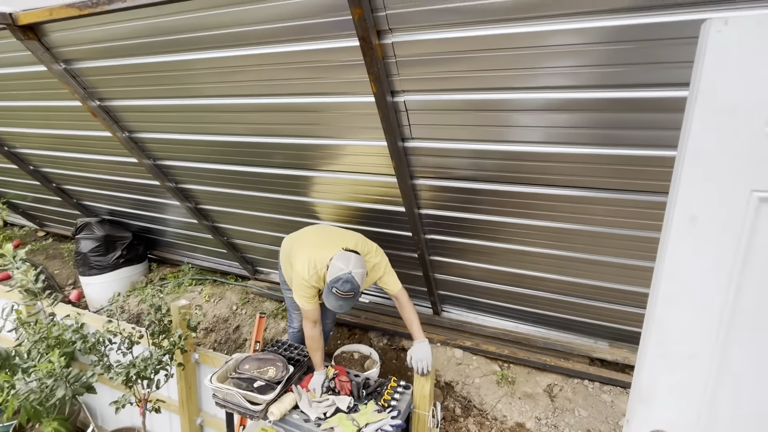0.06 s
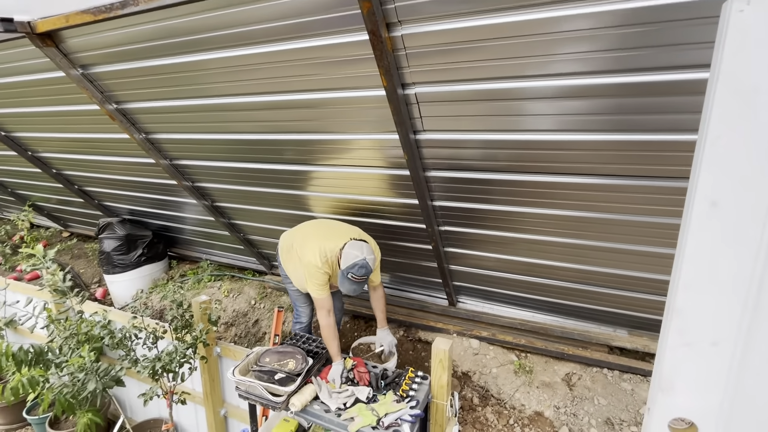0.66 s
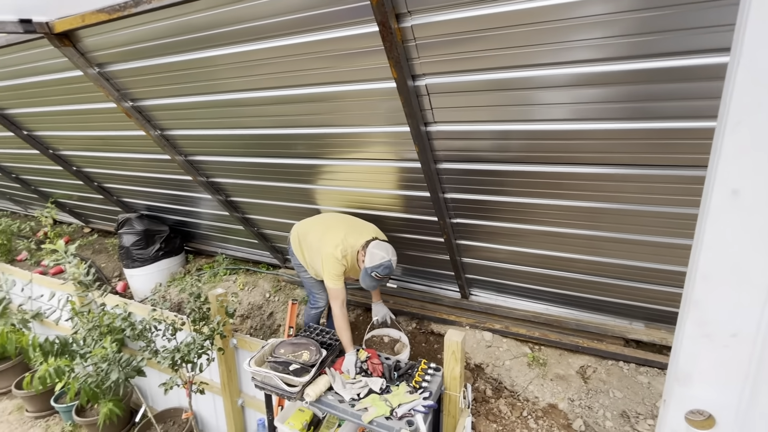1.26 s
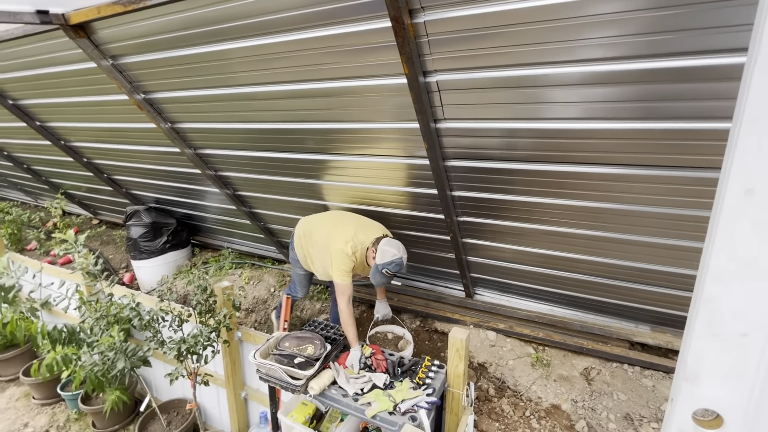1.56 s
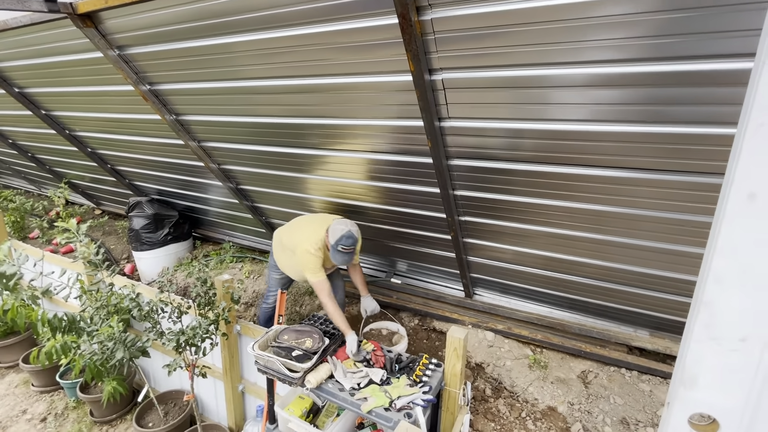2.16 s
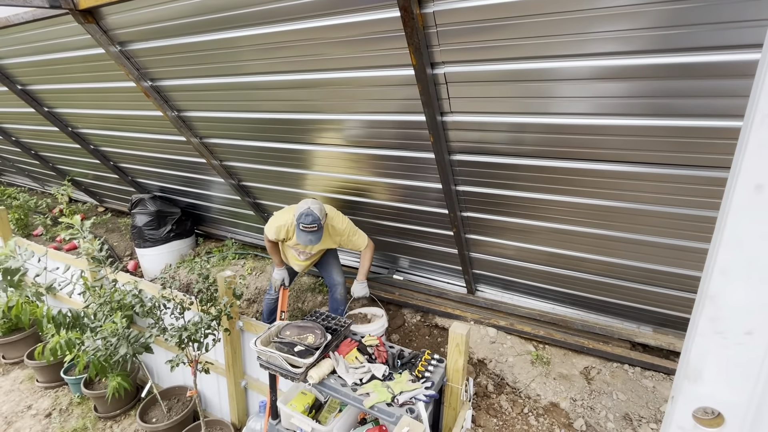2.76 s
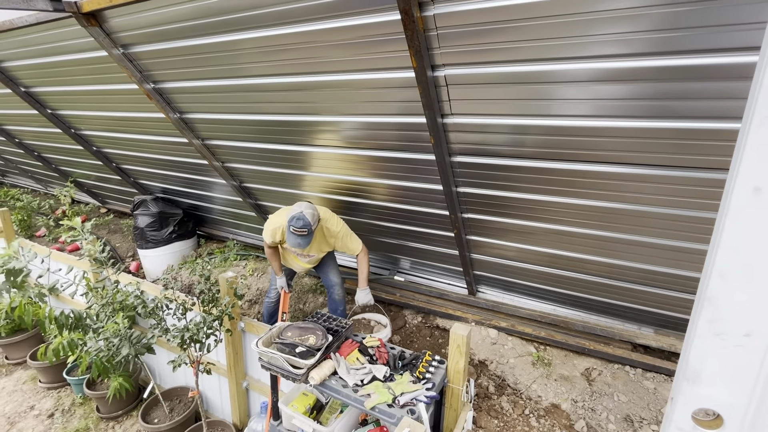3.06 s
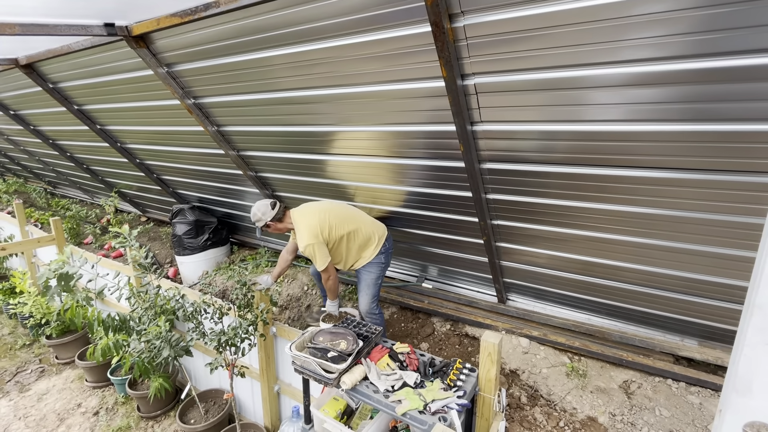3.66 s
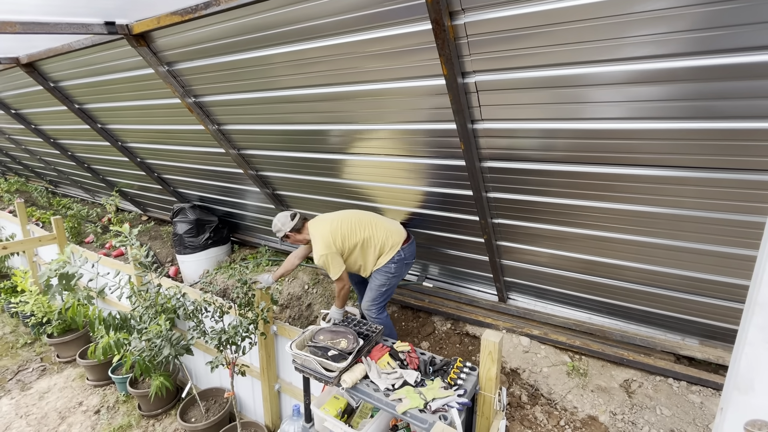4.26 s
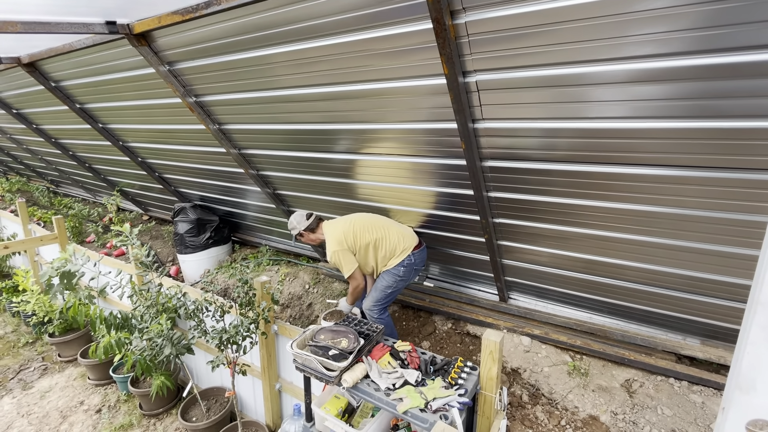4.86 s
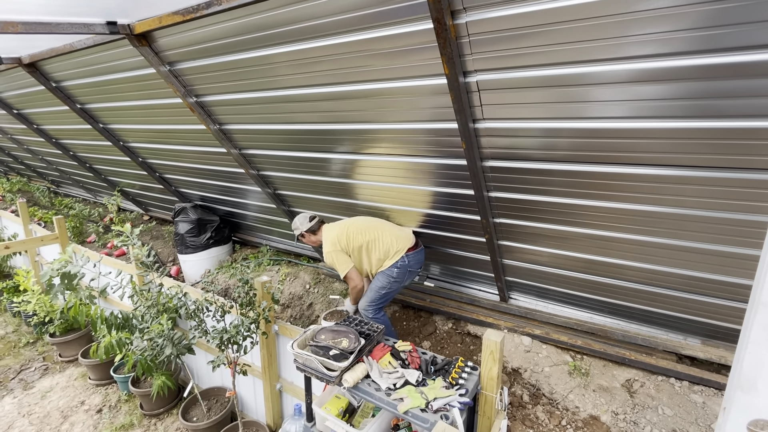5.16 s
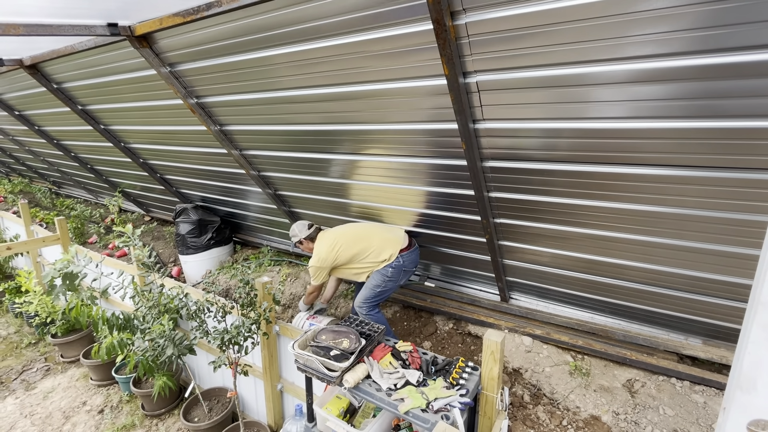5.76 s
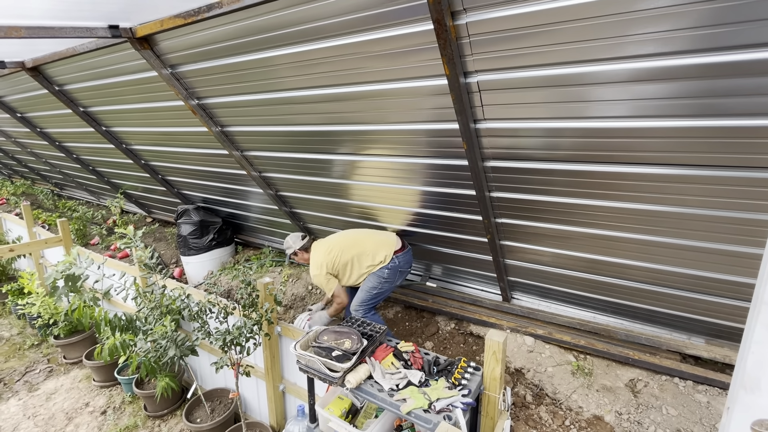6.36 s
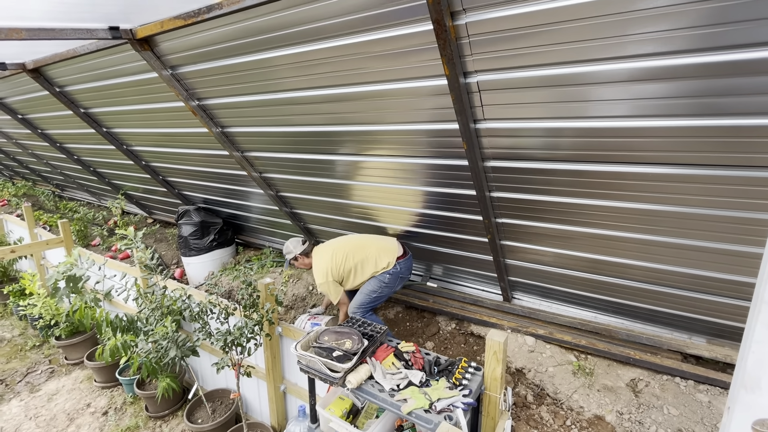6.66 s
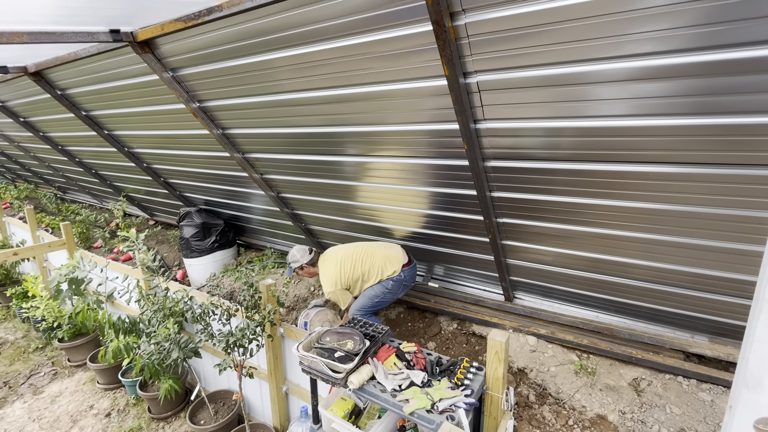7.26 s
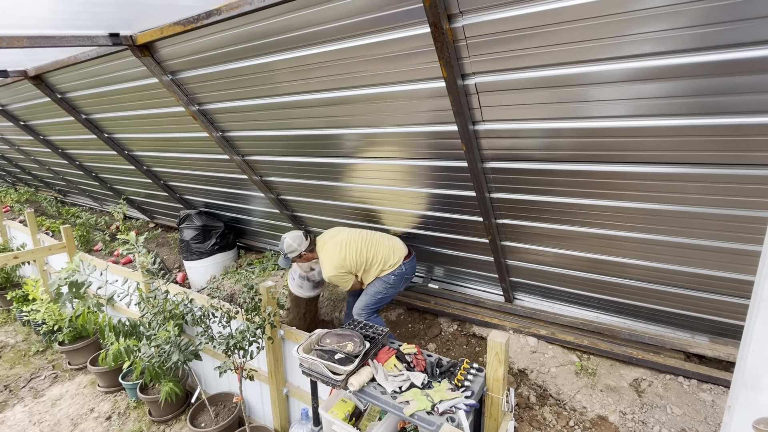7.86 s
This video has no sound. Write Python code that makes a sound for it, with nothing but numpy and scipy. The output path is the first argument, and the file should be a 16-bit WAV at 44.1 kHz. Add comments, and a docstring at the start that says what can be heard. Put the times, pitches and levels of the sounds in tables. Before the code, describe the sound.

Someone works stony soil by hand at the foot of a corrugated metal wall, a few metres from the microphone. Light scrapes and a cluster of knocks lead to one heavy thud a little before halfway. The metal sheets rumble and fade while soil trickles and small stones tick. Busier bucket scraping, knocks, boot shuffles and small tool clinks follow, over faint outdoor hiss.

```python
"""Grit ticks and scrapes over faint outdoor air: someone works stony soil by hand at the foot of a
corrugated steel wall, a few metres from a phone. Something squeaks, things are set down and knocked
about, boots shuffle and hard tools clink. Each blow is a thud, a body, a clack and a spray of grit,
and the wall throws it all back, ringing with its own modes. After the heaviest thud its big sheets
rumble on while soil trickles down."""
import sys
import numpy as np
from scipy import signal
from scipy.fft import rfft, irfft, next_fast_len
from scipy.io import wavfile
from scipy.ndimage import uniform_filter1d

SR = 44100
rng = np.random.default_rng(int(sys.argv[2]) if len(sys.argv) > 2 else 0)


def materialize(psi):
    """Save the field psi as 16-bit PCM at rate SR to the path in sys.argv[1].

    A 1-D psi becomes a single channel; in a 2-D psi each row is a channel.
    """
    bounded = np.clip(np.atleast_2d(psi).T, -1, 1)
    quanta = np.round(bounded * 32767).astype(np.int16)
    wavfile.write(sys.argv[1], SR, quanta)


N = 353682
T = np.arange(N) / SR
RING = 30000  # samples given to one hit and its tail
RING_T = T[:RING]

# The background hiss, turned down a little by the phone midway and then let back up.
# Each row: time in seconds, level in dB.
AIR_LEVEL = [(0, -59), (3.4, -59.5), (5, -62.5), (8.02, -58)]
# Hands and tools dragged through soil. Each row: start and length in seconds, rasp and grit levels in dB.
DRAGS = [(0.081, 0.11, -57.5, -62.5), (0.26, 0.58, -63.5, -81), (1.998, 0.18, -46, -51.5),
         (2.245, 0.14, -59, -57), (2.39, .11, -47, -50), (2.544, 0.26, -61, -60), (2.893, 0.31, -57, -54.5),
         (3.263, 0.32, -56, -64.5), (4.038, 0.028, -67, -52), (5.33, 0.15, -61, -54.5),
         (5.487, 0.18, -46.5, -50), (5.709, 0.17, -38.5, -39.5), (5.971, 0.18, -47.5, -52.5),
         (6.683, 0.24, -52.5, -55.5), (6.96, 0.2, -47, -48), (7.168, 0.28, -43.5, -46.5),
         (7.473, 0.11, -45.5, -48), (7.629, 0.2, -43, -45), (7.825, 0.2, -35.5, -40.5)]
# Small stones flicked or dropped. Each row: start in seconds, level in dB, body over click in dB.
STONE_TICKS = [(0.084, -57, 8), (2.138, -46, -10), (3.086, -43.5, 2), (3.174, -45.5, 1),
               (3.648, -33.5, 4.5), (3.798, -42.5, 2), (3.964, -45.5, -8), (4.171, -45, -25),
               (4.463, -47.5, -0.5), (4.652, -48.5, 4), (4.808, -46.5, 1.5), (5.091, -53.5, 6),
               (5.194, -52.5, 3), (5.322, -54.5, 3), (5.521, -43.5, 0), (5.669, -40, -3), (5.851, -42, -15),
               (6.015, -40.5, 0), (6.285, -39.5, -25), (6.324, -40.5, -10), (6.783, -41, -26),
               (7.182, -35.5, -3)]
# Things set down or knocked. Each row: start in seconds; thud, body, clack and grit levels in dB;
# thud, body and clack pitches in Hz; settling time in seconds.
KNOCKS = [(0.488, -63, -56, -33.5, -37, 136, 256, 930, 0.0013),
          (0.552, -74, -70, -38.5, -42, 134, 600, 1040, 0.0059),
          (1.260, -72, -80, -44, -46.5, 99, 415, 1340, 0.0014),
          (1.471, -37, -34, -25, -38, 110, 480, 1050, 0.0018),
          (1.518, -33, -34, -44, -41.5, 127, 186, 730, 0.038),
          (1.583, -27.5, -26, -20.5, -34.5, 88, 532, 1450, 0.0089),
          (1.639, -25, -29, -26.5, -41.5, 118.3, 506, 1420, 0.0015),
          (1.963, -31, -33.5, -38, -34.5, 127, 148, 700, .015),
          (2.82, -41.5, -53, -38, -40.5, 111, 228, 1180, 0.014),
          (2.952, -42, -50.5, -43, -46.5, 87.5, 251, 1080, .0015),
          (3.293, -33.5, -43.5, -46, -53, 93.5, 150, 880, 0.0054),
          (3.494, -25.5, -33, -30.5, -34.5, 150, 177, 600, .008),
          (3.514, -36, -19, -10.5, -18.5, 79, 320, 1650, 0.0037),
          (3.523, -15.5, -19, -13.5, -29, 97.6, 174, 1360, 0.001),
          (5.459, -48, -41.5, -38.5, -54, 130, 262, 1320, 0.0018),
          (5.573, -41.5, -50, -52, -63, 78, 168, 1350, 0.0071),
          (5.617, -38, -32.5, -33, -38.5, 151.4, 229, 1340, 0.018),
          (5.654, -34.5, -53, -31.5, -49, 146, 159, 1480, 0.0035),
          (5.826, -40, -28, -48, -55, 62.7, 188, 1410, 0.0082),
          (5.886, -23, -19.5, -29, -28, 87.4, 269, 600, 0.0057),
          (6.202, -27.5, -28, -25.5, -32.5, 96.2, 264, 700, .006),
          (6.398, -50, -65, -39.5, -41, 85.6, 188, 1220, 0.014),
          (6.576, -60, -70, -48.5, -73, 84.5, 246, 1300, .004),
          (6.764, -50, -39, -42.5, -39.5, 67, 270, 1350, 0.021),
          (6.877, -29, -30, -24.5, -34, 135, 176, 1470, 0.0086),
          (7.013, -35.5, -37, -55, -60, 97.2, 268, 1367, 0.0018),
          (7.283, -34.5, -35, -22, -31.5, 87.5, 334, 1210, 0.0027),
          (7.403, -55, -38.5, -25.5, -30.5, 101, 325, 1340, 0.0038),
          (7.865, -62, -32.5, -21.5, -36, 119, 217, 1070, 0.0074),
          (7.895, -36.5, -31, -24, -36, 88, 212, 1120, 0.0026)]
# A blow's body, clack and grit layers. Each row: low and high edge in Hz, trim in dB, t60 in seconds,
# the struck thing's resonance in dB, the wall's ring in dB, delay in seconds.
BLOW_LAYERS = [(160, 567, -2.5, 0.14, 6, -3, 0.00277), (630, 2270, -8.5, 0.19, -6, -10.5, 0.00052),
               (2500, 12300, -11, 0.16, -14, -41, 0.000089)]
# The notes of the wall and its base. Each row: pitch in Hz, level in dB, nominal t60 in seconds.
WALL_MODES = [(101.2, -3.5, 0.53), (172.3, -13.5, 0.93), (248.3, -5, 0.082), (322.8, -8, 0.26),
              (568, -16.5, 0.24), (702, -25.5, 0.69), (756, -7, 0.23), (204.2, -4.5, 0.41),
              (1060, -2, 0.093), (1414, -2.5, 0.11), (1530, -3.5, 0.29), (1420, -13, 0.4),
              (1720, -24, 0.23), (1990, -30, 0.34), (486.4, -9, 0.21), (2460, -22, 0.14), (3010, -12, 0.36)]
# Boots shifting on the ground. Each row: start in seconds, length in seconds, level in dB.
BOOT_SHUFFLES = [(0.62, 0.18, -61), (1.07, .35, -66), (1.955, 0.22, -40), (2.264, 0.25, -47.5),
                 (2.605, 0.63, -53), (3.36, .13, -48), (5.593, 0.22, -38.5), (5.763, 0.26, -42.5),
                 (6.118, 0.11, -41), (6.424, 0.56, -53), (6.92, 0.34, -46), (7.337, 0.48, -45.5),
                 (7.848, 0.24, -39)]
# Hard tools touching. Each row: start in seconds, pitch in Hz, level in dB, t60 in seconds.
TOOL_CLINKS = [(3.031, 6400, -49, 0.079), (3.031, 7460, -54, .05), (4.171, 6900, -50.5, .08),
               (4.652, 3380, -62.5, 0.17), (4.809, 2120, -59, 0.22), (4.809, 3390, -60, 0.26),
               (4.921, 6940, -63, .07), (6.784, 3660, -52.5, 0.09), (6.784, 5360, -61, 0.14),
               (7.182, 286, -37, 0.063), (7.182, 2300, -43.5, 0.18), (7.182, 4170, -44, 0.16)]

# The EQ curve of each texture. Each row: frequency in Hz, relative level in dB.
AIR_EQ = [(18, -53), (30, -10.5), (196, 2.5), (328, -0.5), (403, 0.5), (592, -6.5), (747, -5.5), (965, -5),
          (1790, -11.5), (6470, -11.5), (13000, -23.5), (14000, -39.5)]
RASP_EQ = [(260, -28), (450, -8), (493, -4), (625, -2), (670, -5), (805, -5.5), (1000, -3.5), (1430, -7.5),
           (1840, -6.5), (2000, -6.5), (2230, -9.5), (2440, -17), (2800, -15.5), (3640, -58), (6160, -120)]
GRIT_EQ = [(1180, -18.5), (2000, -9.5), (2240, -2.5), (2510, -2), (3480, -5.5), (4200, -3.5), (4630, -4.5),
           (6840, -4.5), (11600, -10.5), (13000, -14), (14000, -22.5)]
BLOW_EQ = [(18, -64), (30, 14), (75, 4.5), (112, -16.5), (157, -11), (290, -8), (407, -15.5), (497, -11.5),
           (755, -15.5), (940, -12.5), (1220, -14.5), (1350, -13), (1490, -15), (2170, -18), (3500, -16.5),
           (4550, -129), (7700, -120)]
BOOT_EQ = [(18, -53), (30, -50), (45, -2), (97, 6.5), (144, -3), (324, -5), (379, -11.5), (431, -17.5),
           (483, -12), (650, -18), (840, -80), (1430, -120)]
RUMBLE_EQ = [(18, -56), (30, -8), (60, 0.5), (96, 2.5), (150, -2), (205, -0.5), (286, -4.5), (481, -17.5),
             (545, -17), (591, -21.5), (800, -25), (1040, -38), (1760, -120)]

# How alike the two microphones hear the nearby work, and the sound from all round.
# Each row: frequency in Hz, likeness from 0 to 1.
NEAR_LIKENESS = [(60, 0.88), (250, 0.86), (600, 0.95), (1200, 0.04), (3000, 0.08), (7000, 0.92), (12000, 0)]
DIFFUSE_LIKENESS = [(60, 0.12), (230, 0.89), (600, 0.42), (3000, .15), (8000, 0.31), (12000, .85)]
# The stereo balance. Each row: frequency in Hz, left minus right in dB.
LEFT_BALANCE = [(100, -0.5), (330, 2), (600, 7.5), (2800, 4.5), (6300, 4.5), (9200, -5.5), (11500, -0.5)]
# The phase between the microphones. Each row: frequency in Hz, the left's lead in radians.
LEFT_LEAD = [(0, 0.5), (340, 0.46), (950, 4.5), (1720, 7.5), (3620, 9.5), (4820, 14.5), (5250, 16.5),
             (7150, 17.5), (8180, 21.5), (9040, 21), (10600, 10.5), (13900, 15)]


def undb(db):
    """Decibels to gain."""
    return 10 ** (np.asarray(db) / 20)


def unit(x):
    """Scale each channel to rms 1."""
    return x / np.sqrt(np.mean(x ** 2, axis=-1, keepdims=True) + 1e-18)


def unit_hit(x):
    """Scale a hit to the energy of 46 ms at rms 1."""
    return x / np.sqrt(np.sum(x ** 2, axis=-1, keepdims=True) / 2048 + 1e-18)


def curve_at(points, hz):
    """Read (Hz, value) points on a log-frequency axis."""
    point_hz, value = np.transpose(points)
    return np.interp(np.log1p(hz), np.log1p(point_hz), value)


def convolve(x, response):
    """Pass a sound through a response, keeping its length."""
    return signal.fftconvolve(np.atleast_2d(x), np.atleast_2d(response), axes=-1)[:, :x.shape[-1]]


def equalise(x, curve, size=4096):
    """Minimum-phase EQ, so nothing rings ahead of an attack."""
    cepstrum = irfft(np.log(undb(curve_at(curve, np.fft.rfftfreq(size, 1 / SR)))))
    cepstrum[1:size // 2] *= 2
    cepstrum[size // 2 + 1:] = 0
    return convolve(x, irfft(np.exp(rfft(cepstrum))))


def band(x, low_hz, high_hz, order=3):
    """Causal band-pass."""
    return signal.sosfilt(signal.butter(order, [low_hz, high_hz], "band", fs=SR, output="sos"), x)


def resonate(x, hz, width):
    """One resonance; its width is a share of its pitch."""
    return band(x, hz / (1 + width / 2), hz * (1 + width / 2), order=1)


def fade(t60):
    """Exponential decay that falls 60 dB in t60 seconds."""
    return np.exp(-np.log(1000) * RING_T / t60)


def drift(rate_hz):
    """Smooth random modulation at rms 1."""
    hold = int(SR / rate_hz)
    steps = np.repeat(rng.standard_normal(N // hold + 1), hold)
    return unit(uniform_filter1d(steps, hold)[:N])


def grains(per_s, spread_db, size):
    """Random clicks, most small and a few large."""
    chance, heft, sign = rng.random(size), rng.exponential(size=size), rng.standard_normal(size)
    return (chance < per_s / SR) * undb(spread_db * np.minimum(heft, 4)) * np.sign(sign)


def add(track, start_s, sound):
    """Mix a sound in at a time."""
    i = int(start_s * SR)
    track[:, i:i + sound.shape[1]] += sound[:, :N - i]


def air(waver_db=-0.6):
    """Faint, wavering background hiss, turned down a little by the phone midway and then let back up."""
    hiss = unit(equalise(rng.standard_normal((2, N)), AIR_EQ))
    return hiss * undb(np.interp(T, *np.transpose(AIR_LEVEL)) + waver_db * drift(2.66))


def echoes(t60, direct, late_db=-17, late_t60=0.93):
    """Direct sound, a dense splash off the corrugations and a weak tail; rows are front and sideways."""
    response = rng.standard_normal((2, RING)) * (fade(t60) + undb(late_db) * fade(late_t60))
    response /= np.sqrt(np.sum(response ** 2, axis=1, keepdims=True))
    response[0, 0] += direct
    return response


def gesture(start_s, length_s, grip_share=0.22, press_db=3, release_t60=0.4):
    """The envelope of one movement: it takes hold, presses harder and lets go."""
    age = T - start_s
    progress = np.clip(age / length_s, 0, 1)
    grip = np.minimum(progress / grip_share, 1)
    release = np.exp(-np.log(1000) * np.maximum(age - length_s, 0) / release_t60)
    return grip * undb(press_db * (progress - .5)) * release


def friction(eq, slips_per_s, spread_db, t60, jerk_db, spots=3):
    """Streams of tiny slips from several spots, each catching at random and with its own echoes."""
    out = 0
    for _ in range(spots):
        slips = grains(slips_per_s / spots, spread_db, N)
        catching = undb(jerk_db * np.clip(drift(22), -1.5, 1.5))
        out = out + unit(convolve(slips * catching, echoes(t60, direct=0.55, late_db=-23)))
    return unit(equalise(out, eq))


def scraping(rasp_db=-1.5):
    """Drags and trickling soil drive a rasp, a layer of grit and loose crumbs."""
    falling = trickle()
    dragged, stirred = undb(-41.5) * falling, undb(-46) * falling
    for start_s, length_s, drag_db, stir_db in DRAGS:
        stroke = gesture(start_s, length_s)
        dragged += undb(drag_db) * stroke
        stirred += undb(stir_db) * stroke
    return undb(rasp_db) * rasp() * dragged + grit() * stirred + crumbs(stirred)


def rasp(hollow_hz=1310, hollow_db=-3):
    """Dragging rasps in the mids, with the hollow note of a bucket."""
    rub = friction(RASP_EQ, slips_per_s=500, spread_db=3.5, t60=0.091, jerk_db=3.5)
    hollow = unit(resonate(rub, hollow_hz, width=0.22))
    return unit(rub + undb(hollow_db) * hollow)


def grit(fine_db=-2.5, coarse_db=-7):
    """Fine grit hisses in many small slips; coarse grit crunches in a few big ones."""
    fine = friction(GRIT_EQ, slips_per_s=1200, spread_db=1.5, t60=0.13, jerk_db=7.5)
    coarse = friction(GRIT_EQ, slips_per_s=77, spread_db=5, t60=0.18, jerk_db=10)
    return undb(fine_db) * fine + undb(coarse_db) * coarse


def crumbs(stirred, count=110, level_db=-9, scatter_db=4):
    """Crumbs of soil tick at random, as loud as the ground is stirred at that moment."""
    out = np.zeros((2, N))
    for slot, (jitter, heft) in enumerate(rng.uniform(-1, 1, (count, 2))):
        i = int((slot + .5 + .5 * jitter) / count * (N - 1))
        add(out, i / SR, stirred[i] * undb(level_db + scatter_db * heft) * stone(body_db=-7))
    return out


def impact(settle_s, t60, first=0.5, direct=0.39, late_t60=0.64, late_db=-19):
    """A first touch and a crumbling of smaller ones, each scattered anew by the corrugated wall."""
    touches = grains(1500, 6.6, RING) ** 2 * np.exp(-RING_T / settle_s)
    touches /= np.sum(touches) + 1e-9
    touches[0] += first
    tail = fade(t60) + undb(late_db) * fade(late_t60)
    energy = np.abs(convolve(touches, tail ** 2))
    sound = rng.standard_normal((2, RING)) * np.sqrt(energy / np.sum(energy))
    sound[0] += direct * np.sqrt(touches) * np.sign(rng.standard_normal(RING))
    return sound


def stone(body_db, centre_hz=4800, scatter_octaves=0.35, tone_db=-10, snap_db=-7):
    """A small stone snaps with a short pitch of its own and a hollow body, and the wall answers."""
    pitch = centre_hz * 2 ** (scatter_octaves * np.clip(rng.standard_normal(), -2, 2))
    click = impact(0.0012, t60=0.2, first=0.38, direct=0.46, late_db=-33)
    snap = band(rng.standard_normal((2, RING)) * fade(0.029), 3500, 14000, order=1)
    layers = [(0, equalise(click, GRIT_EQ)), (tone_db, resonate(click, pitch, width=0.031)),
              (body_db, equalise(click, RASP_EQ)), (snap_db, snap)]
    return unit_hit(sum(undb(db) * unit_hit(layer) for db, layer in layers))


def stone_ticks(trim_db=-4):
    """Single stones, flicked or dropped."""
    out = np.zeros((2, N))
    for start_s, db, body_db in STONE_TICKS:
        add(out, start_s, undb(db + trim_db) * stone(body_db))
    return out


def squeak(peak_s=0.185, half_width_s=0.018, hz=1320, glide_per_s=2.2, roughness=0.113, level_db=-54):
    """Something rubs and gives one small, rough, rising squeak."""
    from_peak = np.clip(T - peak_s, -.1, .1)
    pitch = hz * (1 + glide_per_s * from_peak + roughness * drift(600))
    tone = np.sin(2 * np.pi * np.cumsum(pitch) / SR) * np.exp(-(from_peak / half_width_s) ** 2)
    return undb(level_db) * convolve(tone, echoes(0.22, direct=1))


def knocks(grit_hz=3330, thud_delay_s=0.00372):
    """Each blow layers thud, body, clack and grit; the struck thing resonates and the wall rings."""
    out = np.zeros((2, N))
    for start_s, thud_db, body_db, clack_db, grit_db, thud_hz, body_hz, clack_hz, settle_s in KNOCKS:
        wall = wall_ring(damping=0.9)
        add(out, start_s + thud_delay_s, undb(thud_db) * thud(thud_hz))
        voices = [(body_db, body_hz, BLOW_EQ), (clack_db, clack_hz, BLOW_EQ), (grit_db, grit_hz, GRIT_EQ)]
        for (db, hz, eq), settings in zip(voices, BLOW_LAYERS):
            low_hz, high_hz, trim_db, t60, resonance_db, wall_db, delay_s = settings
            burst = unit_hit(band(equalise(impact(settle_s, t60), eq), low_hz, high_hz))
            resonance = undb(resonance_db) * unit_hit(resonate(burst, hz, width=0.17))
            ring = undb(wall_db) * unit_hit(band(wall, low_hz, high_hz))
            layer = unit_hit(unit_hit(burst + resonance) + ring)
            add(out, start_s + delay_s, undb(db + trim_db) * layer)
    return out


def wall_ring(damping, detune=0.0237, scatter_db=8):
    """The wall's modes; each spot that is struck sounds them a little differently."""
    out = 0
    for hz, db, t60 in WALL_MODES:
        bend, heft, front, sideways = rng.standard_normal(4)
        tone = np.sin(2 * np.pi * hz * (1 + detune * bend) * RING_T)
        envelope = undb(db + scatter_db * heft) * fade(min(t60, .4) / damping)
        out = out + np.sign([[front], [sideways]]) * envelope * tone
    return out


def thud(hz, t60=0.19, rise_s=0.0076, earth_db=-6, wall_db=-6, shudder_db=-11):
    """The struck thing's round boom, with dull earth, the wall's lowest note and its shuddering sheets."""
    boom = np.sin(2 * np.pi * hz * RING_T) * (1 - np.exp(-RING_T / rise_s)) * fade(t60)
    earth = band(impact(0.025, t60=0.29), 62, 141)
    wall = band(wall_ring(damping=0.89), 59, 122, order=2)
    shudder = band(impact(0.019, t60=0.97), 44, 274)
    layers = [(0, boom), (earth_db, earth), (wall_db, wall), (shudder_db, shudder)]
    return unit_hit(sum(undb(db) * unit_hit(layer) for db, layer in layers))


def boots():
    """Soles shift on the ground with a low, dull scuff."""
    trodden = sum(undb(db) * gesture(start_s, length_s) for start_s, length_s, db in BOOT_SHUFFLES)
    return friction(BOOT_EQ, slips_per_s=300, spread_db=1, t60=0.12, jerk_db=3.5) * trodden


def tool_clinks(nominal_width_hz=200):
    """Hard tools touch and ring briefly at a few clear pitches."""
    out = np.zeros((2, N))
    for start_s, hz, db, t60 in TOOL_CLINKS:
        width = np.clip(nominal_width_hz / hz, 0.056, 0.49)
        tap = echoes(t60, direct=0.94, late_db=-24)
        ring = resonate(resonate(tap, hz, width), hz, width)
        add(out, start_s, undb(db) * unit_hit(ring))
    return out


def aftermath(delay_s, rise_s, t60):
    """The envelope of what the heaviest thud sets going: a quick swell and a long decay."""
    heaviest_s = max(KNOCKS, key=lambda row: row[1])[0]
    age = np.maximum(T - heaviest_s - delay_s, 0)
    return (1 - np.exp(-age / rise_s)) * np.exp(-np.log(1000) * age / t60)


def sheet_rumble(level_db=-31):
    """The heaviest blow sets countless low modes of the long sheets going; they die away slowly."""
    low_modes = unit(equalise(rng.standard_normal((2, N)), RUMBLE_EQ))
    return undb(level_db) * aftermath(delay_s=0, rise_s=0.13, t60=4.65) * low_modes


def trickle():
    """The envelope of soil trickling down just after the heaviest thud."""
    return aftermath(delay_s=0.074, rise_s=0.004, t60=4.6)


def microphones(field, likeness):
    """Front and sideways sound meet two close ports; the mids favour the left and reach it first."""
    size = next_fast_len(N + SR // 10)
    hz = np.fft.rfftfreq(size, 1 / SR)
    front, sideways = rfft(field, size)
    alike = curve_at(likeness, hz)
    front, sideways = front * np.sqrt((1 + alike) / 2), sideways * np.sqrt((1 - alike) / 2)
    lean = undb(curve_at(LEFT_BALANCE, hz) / 2)
    lead = np.interp(hz, *np.transpose(LEFT_LEAD))
    pan = lean * np.exp(.5j * lead)
    ports = np.array([(front + sideways) * pan, (front - sideways) / pan])
    # even out the tone of the mono sum, boosting by 6 dB at most
    mono_gain = np.sqrt(lean ** 2 + lean ** -2 + 2 * alike * np.cos(lead)) / 2
    return irfft(ports / np.maximum(mono_gain, .5), size)[:, :N]


def scene(trim_db=-1):
    """The work close by, and the rumble and air from all round."""
    work = knocks() + stone_ticks() + tool_clinks() + squeak() + scraping() + boots()
    around = sheet_rumble() + air()
    return undb(trim_db) * (microphones(work, NEAR_LIKENESS) + microphones(around, DIFFUSE_LIKENESS))


def record(dry, top_hz=13700):
    """The phone cuts the top steeply."""
    return signal.sosfilt(signal.ellip(8, .2, 70, top_hz, fs=SR, output="sos"), dry)


dry = scene()
out = record(dry)
materialize(out)
```